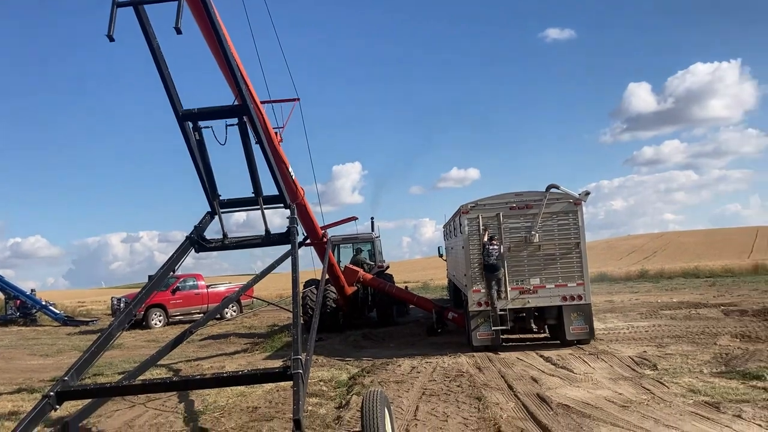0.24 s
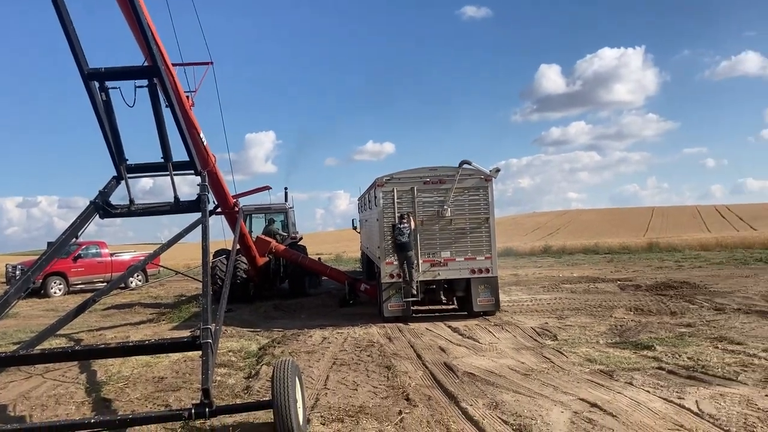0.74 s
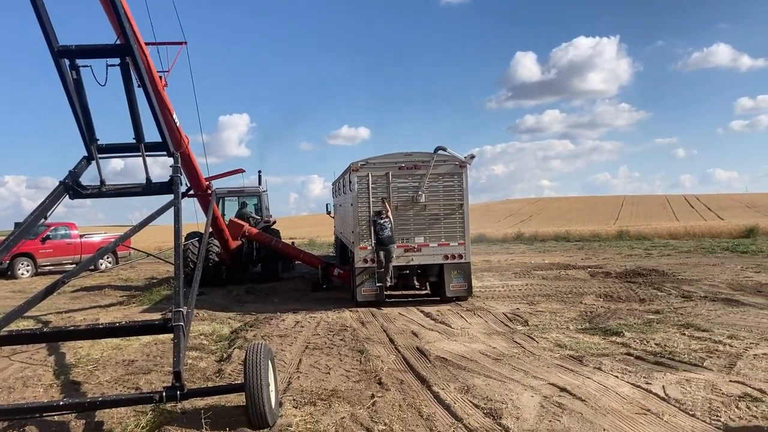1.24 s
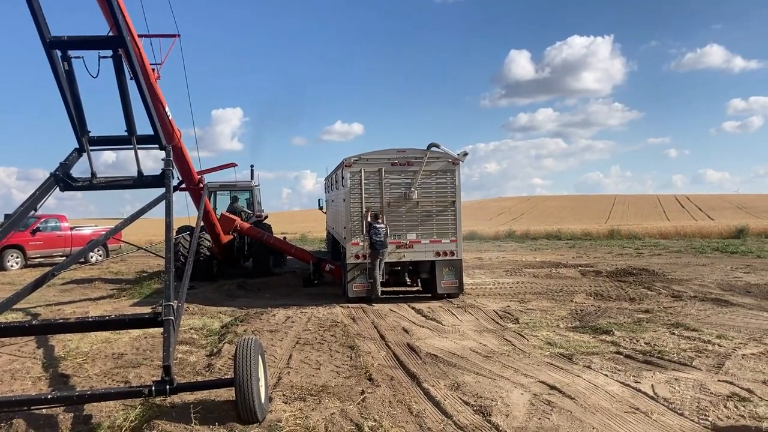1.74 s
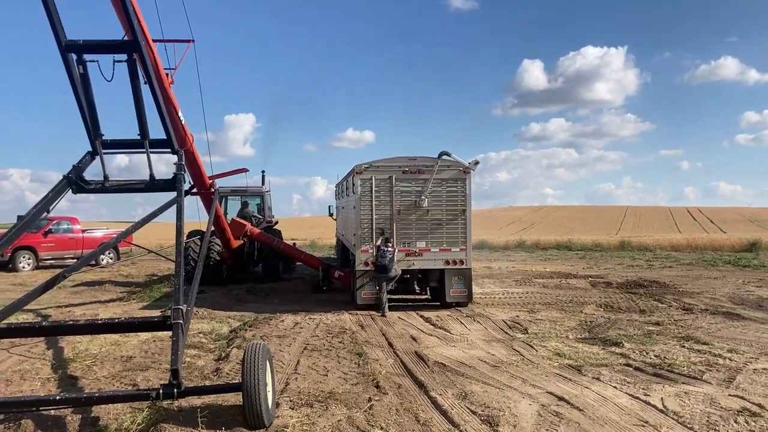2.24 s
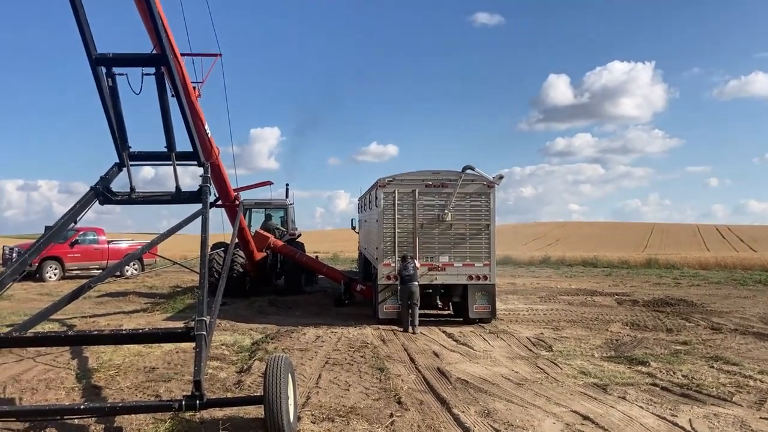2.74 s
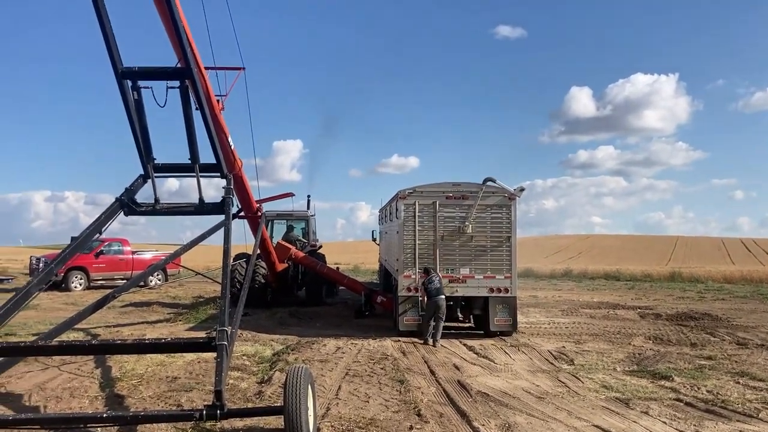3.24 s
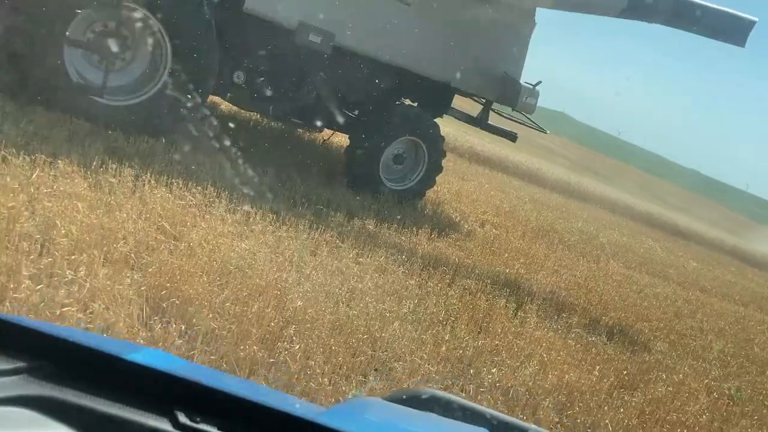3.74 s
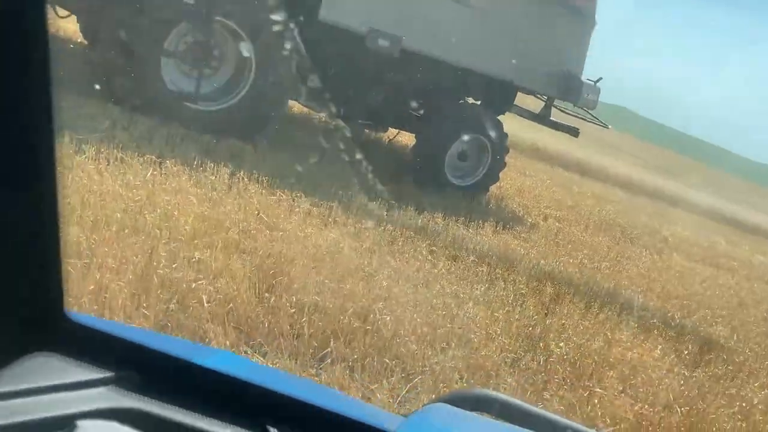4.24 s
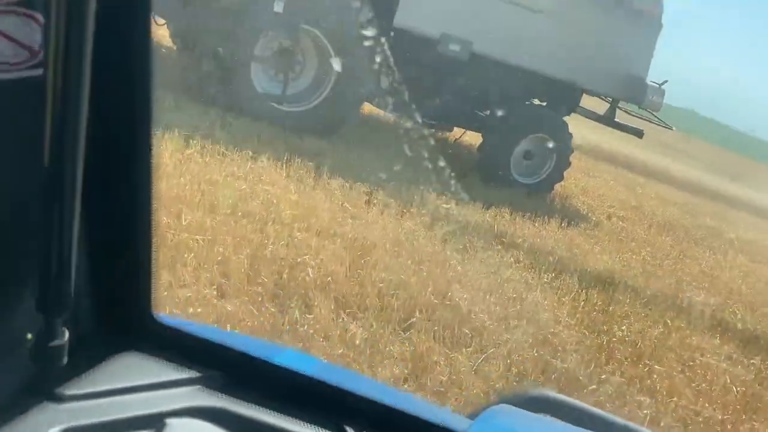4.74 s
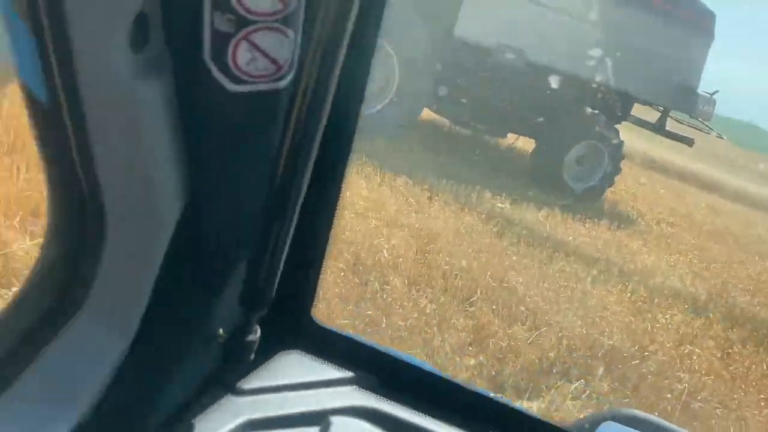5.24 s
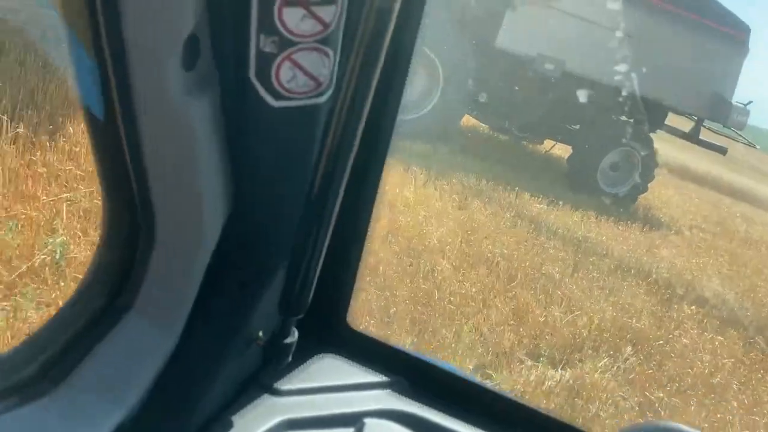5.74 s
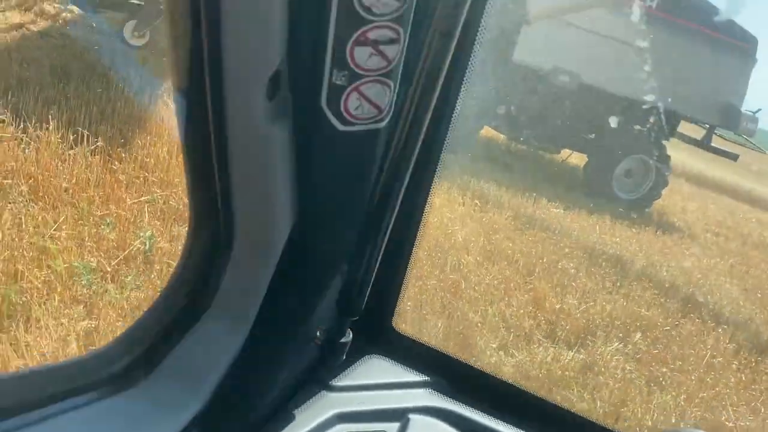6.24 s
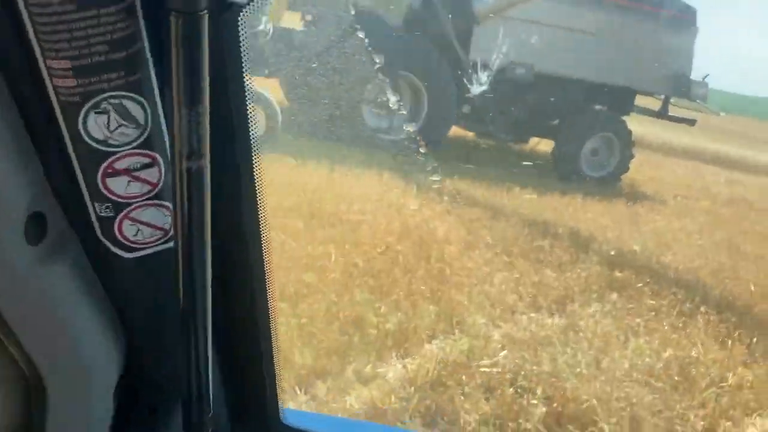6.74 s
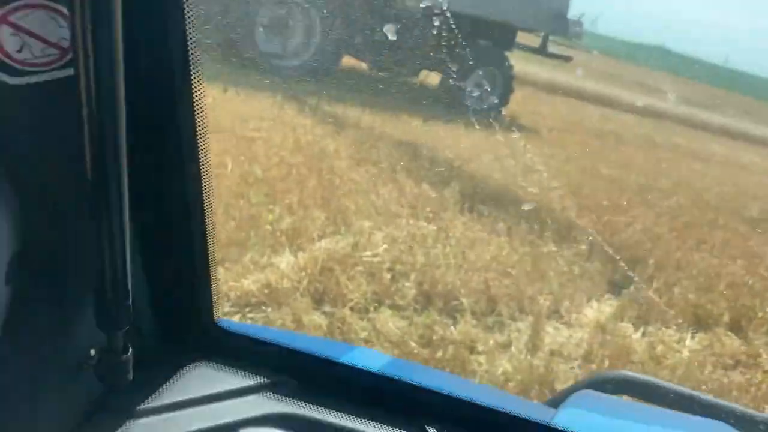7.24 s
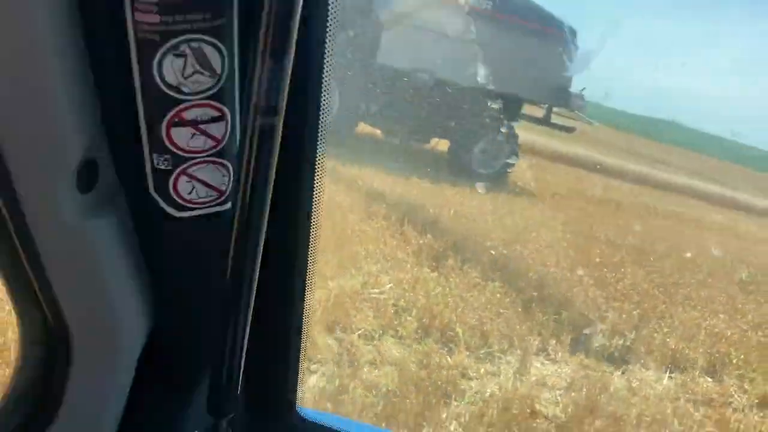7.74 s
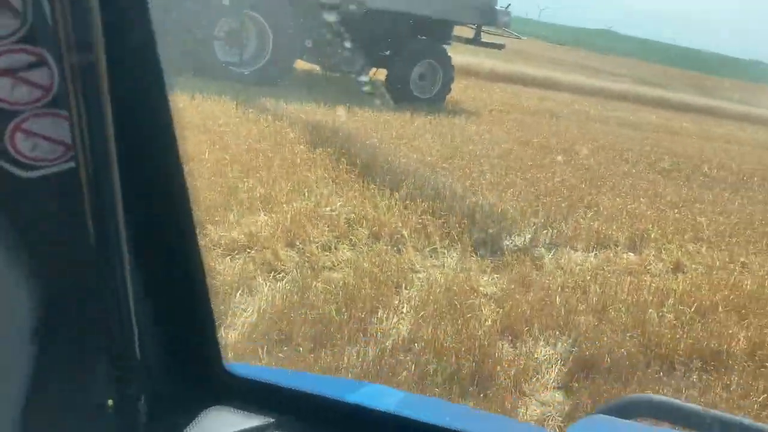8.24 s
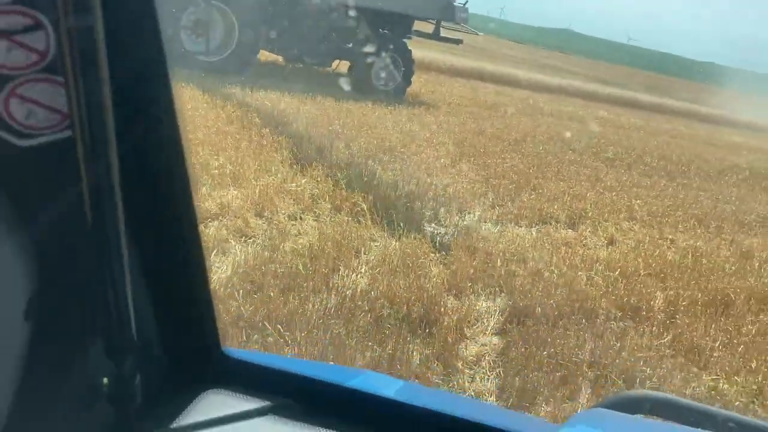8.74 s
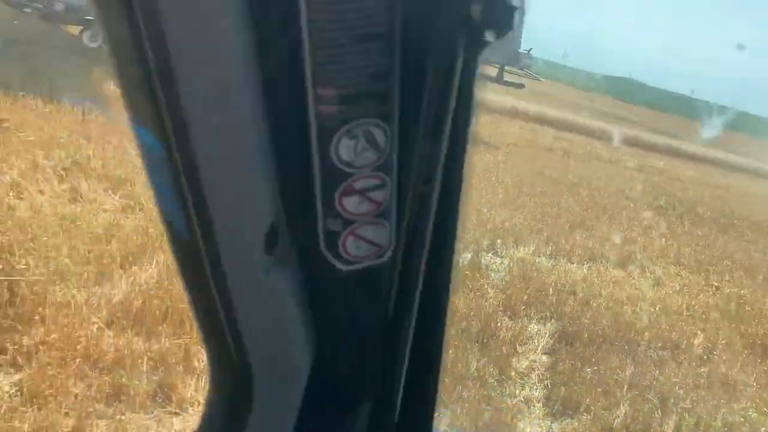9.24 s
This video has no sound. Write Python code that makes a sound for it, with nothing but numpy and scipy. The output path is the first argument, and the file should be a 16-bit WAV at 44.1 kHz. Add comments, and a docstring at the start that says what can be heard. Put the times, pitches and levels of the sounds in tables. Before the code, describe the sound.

From the start, grain roars through the steel tube of a tractor-driven auger in an open yard, above a steady engine hum. The screw slaps grain against the wall about seven or eight times a second; each turn swells the roar with a short clang and low thud. Loose metal rattles between, and some blows land harder, around 1, 2.1 and 3.5 seconds.

At about 3.7 seconds a hard cut moves inside a closed tractor cab beside a harvester. A deep engine boom fills the space, over rumble, fan noise, the harvester's steady drone and faint gear whines. The engine pitch wavers under load, most between 5 and 7 seconds. A soft bump comes at 4 seconds. Three small plastic ticks fall between 8.4 and 9.1 seconds, and two dull rattles around 9.1 and 9.4, as the drone continues to the end. A phone captures everything in stereo.

```python
"""Grain roars through the steel tube of a tractor-driven auger in an open yard, over the engine's hum.
Each turn of the screw slaps grain on the wall: the roar swells, the steel clangs, the tube thuds.
Hard cut to a closed tractor cab beside a harvester. Engine orders boom through the panels over
rumble, fan noise and gear whine, with a few trim ticks and dull bumps.
A phone with two spaced ports listens."""
import sys
import numpy as np
from scipy import signal
from scipy.fft import rfft, irfft, next_fast_len
from scipy.io import wavfile
from scipy.ndimage import uniform_filter1d, map_coordinates

SR = 44100
rng = np.random.default_rng(int(sys.argv[2]) if len(sys.argv) > 2 else 0)


def file_out(sig):
    """Save sig as 16-bit WAV at sys.argv[1]."""
    # one column per channel
    cols = np.atleast_2d(sig).T
    # limit, then scale
    lim = np.clip(cols, -1, 1)
    pcm = np.round(lim * 32767).astype(np.int16)
    wavfile.write(sys.argv[1], SR, pcm)


N = 418950
CUT_S, TURN_HZ = 3.677, 7.51

# grain roar: freq_hz, relative_density_db
GRAIN_SPECTRUM = [(12, -25), (25, -34), (55, -3.5), (100, -11.5), (160, -6), (210, -13.5), (357, -15.5),
                  (900, -19.5), (1300, -18.5), (2750, -26.5), (4200, -25.5), (5700, -30), (8000, -27),
                  (15500, -34)]
# tube and gear resonances: freq_hz, width_hz, gain_db
TUBE_PEAKS = [(236, 9, 2), (275, 55, 8), (405, 40, 3), (417, 5, 2), (590, 410, 4.5), (1660, 67, 1),
              (2110, 86, 4.5)]
# gear mesh: freq_hz, width_hz, gain_db
MESH_PEAKS = [(1291, 9, 5), (1965, 10, 10), (2360, 9, 4), (2557, 14, 6)]
# hardest slaps, some between turns: time_s, swell_db
HARD_SLAPS = [(.084, 3), (.215, 2.7), (.346, 3.2), (.504, 2), (.611, 3), (1.038, 2), (1.545, 3),
              (1.675, 1.6), (1.947, 2.6), (2.079, 4.6), (2.479, 3), (2.913, 1.5), (3.008, 3.2), (3.158, 2),
              (3.27, 2.8), (3.407, 3), (3.545, 4.6)]
# swell depth by pitch: freq_hz, swell_factor
SWELL_DEPTH = [(100, .3), (400, 1.1), (1000, 1.4), (3000, 1.15), (6000, 1.3), (12000, .7)]
# tube and hopper modes, before grain loading: pitch_hz, relative_db, t60_s
STEEL_MODES = [(533, -6, 0.11), (616, -3.5, 0.15), (687, -4.5, 0.28), (1030, -3.5, 0.21),
               (1156, -1.5, 0.12), (1237, -6, 0.16), (1425, -5, 0.12), (1558, -0.5, 0.093),
               (1693, -7, 0.14), (2000, -8, 0.11), (2620, -15, 0.07), (3400, -26, .05), (4330, -16, .05)]
# mode shift by grain load, blow to blow: pitch_ratio
STEEL_DETUNE = [.96, .985, 1.01, 1.04]
# low tube modes: pitch_hz, level_db, t60_s
THUD_MODES = [(57, -49, 0.19), (89, -26, 0.021), (128, -32, 0.18), (267, -29.5, 0.08), (298.3, -30, 0.12)]
# sharper tube knocks: start_s, over_thud_db
KNOCKS = [(.625, 4), (1.026, 13), (1.12, 5), (2.76, 7), (3.44, 5)]
# engine orders and shaft hum: pitch_hz, rms_db, waver_db
YARD_TONES = [(35, -50, 1), (70, -30, .6), (140, -28.5, .6), (144.7, -36, 1), (280, -40, .8),
              (289.4, -44, 1)]

# cab engine hunting under load: time_s, cycle_hz
ENGINE_SPEED = [(3.7, 17.8), (4.0, 18.21), (4.3, 18.32), (4.55, 17.94), (4.92, 18.25), (5.22, 20.06),
                (5.43, 19.3), (5.64, 17.61), (5.92, 20.07), (6.35, 17.88), (6.74, 22.07), (7.04, 19.67),
                (7.45, 18.89), (7.75, 19.81), (8.03, 19.64), (8.3, 18.12), (8.65, 19.06), (8.97, 19.75),
                (9.3, 18.2), (9.5, 18.66)]
# engine orders, before the panels: multiple, level_db
ENGINE_ORDERS = [(2, -29), (3, -21.5), (4, -22.5), (5, -11), (6, -52), (7, -22.5), (8, -35), (9, -33),
                 (10, -42.5), (11, -43), (12, -39.5), (13, -45.5), (14, -39)]
# cab panel response: freq_hz, gain_db
PANEL_GAIN = [(37, -4), (42, 1.5), (54, -2.5), (59, 1), (67, 2), (73, -0.5), (81, 2.5), (89, -4.2),
              (101, -4.8), (110, -4.5), (128, -7.5), (146, -5), (158, -1), (164, -7.5), (175, 4),
              (186, -13), (205, -3.5), (260, -7.5)]
# rumble and fan: freq_hz, relative_density_db
CAB_SPECTRUM = [(10, -45), (24, -26), (40, -10), (100, -16), (170, -14), (220, -23.5), (320, -25),
                (370, -32), (950, -38), (2000, -44.5), (4300, -49.5), (5800, -55), (8000, -57),
                (15500, -66.5)]
# panel and gear resonances: freq_hz, width_hz, gain_db
CAB_PEAKS = [(340, 7, 5.5), (366, 6, 4), (754, 50, 3), (845, 30, 3), (1020, 10, 5), (1240, 30, 2.5),
             (1400, 30, 2.5), (5001, 20, 3), (1350, 190, -1.5), (1620, 300, 1.5), (2450, 150, 2.5)]
# rumble band lifts: time_s, growl_db, treble_db
RUMBLE_LIFTS = [(3.68, -6, 1.2), (5.2, -1, 0), (6.7, 0.7, 0), (8, -2, 0.5), (8.6, 0.5, -0.5),
                (9.05, -4.5, 0.9), (9.5, 3, 4)]
# cab tones, harvester drone first: pitch_hz, rms_db, waver_db
CAB_TONES = [(108.9, -23.5, 1.5), (174.6, -36, 2), (237.6, -46, 2), (359.4, -55, 3)]
# transmission and harvester whines: time_s, low_hz, low_db, high_hz, high_db, harvester_db
WHINES = [(3.68, 1250, -52, 1600, -54, -50), (4.55, 1270, -48, 1590, -50, -47),
          (4.85, 1290, -53, 1620, -51, -46), (5.2, 1305, -45, 1720, -53, -45),
          (5.65, 1310, -53, 1725, -54, -47), (6.1, 1320, -51, 1740, -47, -46),
          (6.45, 1330, -48, 1760, -51, -43.5), (6.8, 1290, -47.5, 1780, -49.5, -43.5),
          (7.2, 1300, -53, 1780, -50, -46.5), (7.37, 1320, -49, 1650, -46, -47),
          (7.55, 1330, -47.5, 1585, -48, -46), (8, 1310, -52, 1580, -54, -46),
          (9.5, 1260, -52, 1580, -57, -49)]
# plastic trim: start_s, peak_db, t60_s
TICKS = [(8.3914, -36, 0.08), (8.7135, -28, 0.12), (9.1005, -34, 0.08)]
# dull rattles: start_s, peak_db, t60_s
BUMPS = [(4.0257, -32, 0.19), (5.4849, -46, 0.14), (6.3964, -43, 0.15), (9.131, -21, 0.15),
         (9.436, -28, 0.17)]

# match between ports: freq_hz, coherence, right_lead_rad
YARD_PORTS = [(60, 0.95, 0.47), (273, 0.99, 0.3), (815, 0.6, -0.8), (1240, 0.92, -1.2), (1750, 0.13, -2),
              (2120, 0.05, -2.5), (3820, 0.03, -5), (4350, 0.53, -5), (5460, 0.3, -8.5), (6100, 0.3, -7)]
CAB_PORTS = [(25, 0.995, 0.15), (60, 0.9, 0.65), (176, 0.92, 0.06), (412, 0.35, 0), (718, 0.64, -1.5),
             (950, 0.057, 4.5), (1370, 0.44, 0), (1970, 0.092, 3.5), (3680, 0.04, 3), (4640, 0.13, 7.5),
             (5500, 0.1, 2), (6100, 0.058, 6)]
# port balance: freq_hz, left_over_right_db
YARD_BALANCE = [(60, 1.0), (180, -0.5), (550, -0.62), (1650, 0.6), (4970, 0.12), (15000, 0.0)]
CAB_BALANCE = [(60, -0.73), (180, 0.33), (550, 0.78), (1650, 1.0), (4970, 0.15), (15000, -0.11)]


def screw_slaps(first_s=.077, swell_db=1.9, jitter_s=.007, spread_db=.55):
    """One uneven slap a turn, as time_s, swell_db; a hard slap on a turn replaces it."""
    turn_s = np.arange(first_s, CUT_S, 1 / TURN_HZ)
    slaps = np.c_[turn_s, np.full(len(turn_s), swell_db)]
    slaps += rng.standard_normal(slaps.shape) * [jitter_s, spread_db]
    hard = np.array(HARD_SLAPS)
    free = np.abs(turn_s[:, None] - hard[:, 0]).min(axis=1) > .02
    return np.r_[slaps[free], hard]


def grain_roar(t, slaps, level_db=-24, rise_s=.013, fall_s=.045, fast_above_hz=4000):
    """Grain thrown at the tube wall: noise swells on each slap, the treble dying first."""
    def swell_db(hz, time_s):
        since_s = time_s - slaps[:, :1]
        rising = since_s < 0
        shape = np.where(rising, np.exp(-(since_s / rise_s) ** 2), np.exp(-np.abs(since_s) / fall_s))
        slow_db = (slaps[:, 1:] * shape).sum(axis=0)
        fast_db = (slaps[:, 1:] * shape ** np.where(rising, 1, 3)).sum(axis=0)
        fast_share = hz / (hz + fast_above_hz)
        return at_hz(SWELL_DEPTH, hz) * ((1 - fast_share) * slow_db + fast_share * fast_db)
    noise = coloured_noise(t, GRAIN_SPECTRUM, TUBE_PEAKS + MESH_PEAKS, YARD_PORTS, YARD_BALANCE)
    return amp(level_db) * modulate(noise, t, swell_db, common_db=.06, band_db=1.14)


def steel_clangs(t, slaps, clang_db=-37.5, crack_db=-33, rattle_db=-38, rattles_per_s=90):
    """Steel cracks and rings on each slap, harder on big swells; loose parts rattle between."""
    slap_s, swell_db = slaps.T
    force_db = 3 * swell_db
    rattles = np.flatnonzero(rng.random(len(t)) < rattles_per_s / SR)
    hits = np.r_[((slap_s - .006) * SR).astype(int), rattles]  # blow leads the swell's top
    hit_db = np.r_[clang_db + force_db, np.full(len(rattles), rattle_db)]
    parts = np.zeros((3, len(t)))
    for hz, mode_db, t60_s in STEEL_MODES:
        sizes = amp(hit_db + mode_db + rng.normal(0, 4, (3, len(hits))))
        sizes *= rng.choice([-1, 1], sizes.shape)
        detune = rng.choice(STEEL_DETUNE, len(hits))
        for ratio in STEEL_DETUNE:
            clicks = np.zeros_like(parts)
            clicks[:, hits[detune == ratio]] = sizes[:, detune == ratio]
            parts += ring(clicks, hz * ratio, t60_s * .95)  # grain damps the ring
    cracks = [(s - .004, crack_db + db, .06) for s, db in zip(slap_s, force_db)]
    parts += bursts(t, cracks, band_hz=(640, 2360))
    return at_ports(*parts, YARD_PORTS, YARD_BALANCE)


def tube_thuds(t, first_s=.075, spread_db=1.2, knock_above_hz=200):
    """The screw rings the tube's low modes once a turn; sharper knocks wake only the upper ones."""
    turn_s = np.arange(first_s, t[-1], 1 / TURN_HZ)
    start_s, extra_db = np.r_[np.c_[turn_s, np.zeros(len(turn_s))], KNOCKS].T
    is_turn = np.arange(len(start_s)) < len(turn_s)
    out = 0
    for hz, level_db, t60_s in THUD_MODES:
        sizes = amp(level_db + extra_db + rng.normal(0, spread_db, len(start_s)))
        clicks = np.zeros(len(t))
        clicks[(start_s * SR).astype(int)] = sizes * (is_turn | (hz >= knock_above_hz))
        out += ring(clicks, hz, t60_s)
    return out


def engine_boom(t, waver_db=.4, dip_hz=66, dip_lag_rad=1.9):
    """Orders locked into one pulse a cycle, coloured by the cab panels as the speed moves."""
    cycle_hz, = at_time(ENGINE_SPEED, t)
    cycle_rad = 2 * np.pi * np.cumsum(cycle_hz) / SR
    out = 0
    for (multiple, level_db), waver in zip(ENGINE_ORDERS, wavers(len(ENGINE_ORDERS), t)):
        hz = round(multiple) * cycle_hz
        gain = amp(level_db + at_hz(PANEL_GAIN, hz) + waver_db * waver)
        lag_rad = dip_lag_rad / (1 + (hz / dip_hz) ** 14)  # orders below the cab's dip come late
        out -= gain * np.cos(round(multiple) * cycle_rad - lag_rad)
    return np.sqrt(2) * out * amp([[-.3], [.3]])


def machine_hum(t, table):
    """Engine, shaft or harvester tones: steady pitch, wavering level."""
    out = 0
    for (hz, rms_db, waver_db), waver in zip(table, wavers(len(table), t)):
        gain = np.sqrt(2) * amp(rms_db + waver_db * waver)
        out += gain * np.sin(2 * np.pi * (hz * t + rng.random()))
    return out


def cab_rumble(t, level_db=-21.5, growl_hz=287):
    """Rumble and fan noise; a low-mid growl and the treble rise and fall."""
    def lift_db(hz, time_s):
        growl_db, treble_db = at_time(RUMBLE_LIFTS, time_s)
        growl_band = np.exp(-np.log2((hz + 1) / growl_hz) ** 2 / .33)
        return growl_db * growl_band + treble_db * np.clip(hz / 7000, 0, 1)
    noise = coloured_noise(t, CAB_SPECTRUM, CAB_PEAKS, CAB_PORTS, CAB_BALANCE)
    return amp(level_db) * modulate(noise, t, lift_db, common_db=-.63, band_db=1.5)


def gear_whines(t, harvester_hz=679, wander_ratio=.008, waver_db=1.5):
    """Two transmission whines and the harvester's, blurred by wandering level and phase."""
    low_hz, low_db, high_hz, high_db, harvester_db = at_time(WHINES, t)
    voices = [(low_hz, low_db, 40), (high_hz, high_db, 40), (harvester_hz, harvester_db, 12)]
    out = 0
    for hz, level_db, blur_hz in voices:
        wander, waver = drift((2, len(t)), smooth=SR // 5)
        phase = 2 * np.pi * np.cumsum(hz * (1 + wander_ratio * wander)) / SR
        in_phase, quadrature = drift((2, 2, len(t)), smooth=int(SR / blur_hz / 2))  # per side
        out += amp(level_db + waver_db * waver) * (in_phase * np.cos(phase) + quadrature * np.sin(phase))
    return out


def ticks_and_bumps(t, snap_db=2, snap_t60_s=.012):
    """Plastic trim ticks, each opening with a snap, and dull rattles."""
    snaps = [(start_s, peak_db + snap_db, snap_t60_s) for start_s, peak_db, _ in TICKS]
    ticks = bursts(t, TICKS + snaps, band_hz=(7600, 12800))
    bumps = bursts(t, BUMPS, band_hz=(800, 2500))
    return at_ports(*(ticks + bumps), CAB_PORTS, CAB_BALANCE)


def coloured_noise(t, spectrum, peaks, ports, balance):
    """Stereo noise with resonances, rms 1."""
    hz = np.fft.rfftfreq(len(t), 1 / SR)
    peaks_db = sum(db / (1 + (2 * (hz - peak_hz) / width_hz) ** 2) for peak_hz, width_hz, db in peaks)
    white = at_ports(*rng.standard_normal((3, len(t))), ports, balance)
    noise = irfft(rfft(white) * amp(at_hz(spectrum, hz) + peaks_db), len(t))
    return noise / noise.std()


def modulate(noise, t, lift_db, common_db, band_db):
    """Bands flicker together and singly; lift_db(hz, time_s) shapes them."""
    hz, frame_s, cells = signal.stft(noise, SR, nperseg=512, noverlap=320)
    band = 3 * np.log2(hz / 150 + 1)  # third octaves in the treble
    grid = np.meshgrid(band, np.arange(len(frame_s)), indexing="ij")
    per_band = map_coordinates(drift((24, len(frame_s)), smooth=4), grid, order=1)
    common = drift(len(frame_s), smooth=3)
    flicker_db = (common_db * common + band_db * per_band) * np.clip(hz[:, None] / 600, 0, 1)
    cells *= amp(flicker_db + lift_db(hz[:, None], frame_s + t[0]))
    return signal.istft(cells, SR, nperseg=512, noverlap=320)[1][:, :len(t)]


def bursts(t, events, band_hz, crest_db=9):
    """Decaying band noise as shared, left and right parts."""
    bandpass = signal.butter(2, band_hz, "band", fs=SR, output="sos")
    noise = signal.sosfilt(bandpass, rng.standard_normal((3, len(t))))
    envelope = sum(amp(peak_db - crest_db - 60 * np.abs(t - start_s) / t60_s) * (t > start_s)
                   for start_s, peak_db, t60_s in events)
    return envelope * noise / noise.std()


def ring(clicks, hz, t60_s):
    """One mode: a unit click starts a decaying unit sine."""
    radius, step_rad = amp(-60 / (t60_s * SR)), 2 * np.pi * hz / SR
    feedback = [1, -2 * radius * np.cos(step_rad), radius ** 2]
    return signal.lfilter([0, np.sin(step_rad)], feedback, clicks + 1e-18)


def at_ports(shared, left_own, right_own, ports, balance):
    """Two spaced ports: a shared part plus their own; the treble is mostly shared, left late."""
    treble_hz, treble_coherence, in_phase_hz, lag_s = 6660, .87, 6820, .00022
    hz = np.fft.rfftfreq(len(shared), 1 / SR)
    treble = np.clip((hz - treble_hz) / 800 + .5, 0, 1)
    coherence = np.clip(at_hz(ports, hz) * (1 - treble) + treble_coherence * treble, 0, 1)
    lead_rad = np.where(treble > .5, 2 * np.pi * (hz - in_phase_hz) * lag_s, at_hz(ports, hz, column=2))
    common = np.sqrt(coherence) * rfft(shared)
    tilt = amp(at_hz(balance, hz) / 2)
    left = (common + np.sqrt(1 - coherence) * rfft(left_own)) * tilt
    right = (common * np.exp(1j * lead_rad) + np.sqrt(1 - coherence) * rfft(right_own)) / tilt
    return irfft(np.array([left, right]), len(shared))


def drift(shape, smooth):
    """Smoothed noise along the last axis, spread 1."""
    slow = uniform_filter1d(uniform_filter1d(rng.standard_normal(shape), smooth), smooth)
    return slow / slow.std()


def wavers(count, t, hop=400):
    """Slow drifts at audio rate."""
    coarse = drift((count, len(t) // hop + 2), smooth=14)
    return [np.interp(np.arange(len(t)) / hop, np.arange(len(row)), row) for row in coarse]


def at_time(table, t):
    """Table columns at times t."""
    time_s, *columns = np.transpose(table)
    return [np.interp(t, time_s, column) for column in columns]


def at_hz(table, hz, column=1):
    """Table column over log frequency."""
    columns = np.transpose(table)
    return np.interp(np.log(hz + 1), np.log(columns[0]), columns[column])


def amp(db):
    """dB to gain."""
    return 10 ** (np.asarray(db) / 20)


def scene():
    """Yard, hard cut, cab."""
    cut = int(CUT_S * SR)
    t = np.arange(next_fast_len(cut)) / SR
    slaps = screw_slaps()
    yard = grain_roar(t, slaps) + steel_clangs(t, slaps) + tube_thuds(t) + machine_hum(t, YARD_TONES)
    t = CUT_S + np.arange(next_fast_len(N - cut)) / SR
    cab = cab_rumble(t) + ticks_and_bumps(t) + engine_boom(t)
    cab += machine_hum(t, CAB_TONES) + gear_whines(t)
    cab *= np.minimum((t - CUT_S) / .003, 1)  # 3 ms fade-in, no click
    return np.hstack([yard[:, :cut], cab[:, :N - cut]])


def record(dry):
    """Soft peak rounding, then a steep low-pass."""
    ceiling, cutoff_hz = 1.6, 15700
    lowpass = signal.ellip(12, .5, 70, cutoff_hz, fs=SR, output="sos")
    return signal.sosfilt(lowpass, ceiling * np.tanh(dry / ceiling))


dry = scene()
out = record(dry)
file_out(out)
```